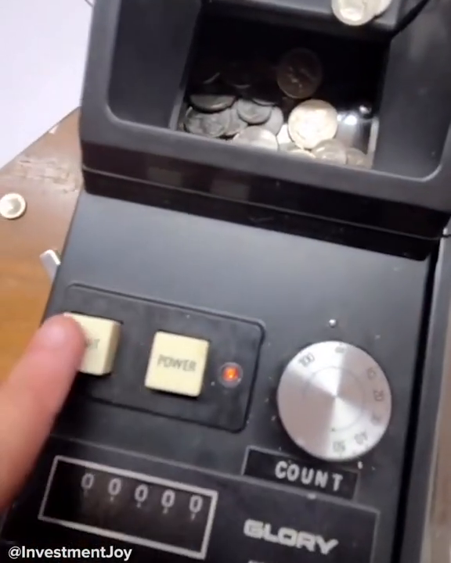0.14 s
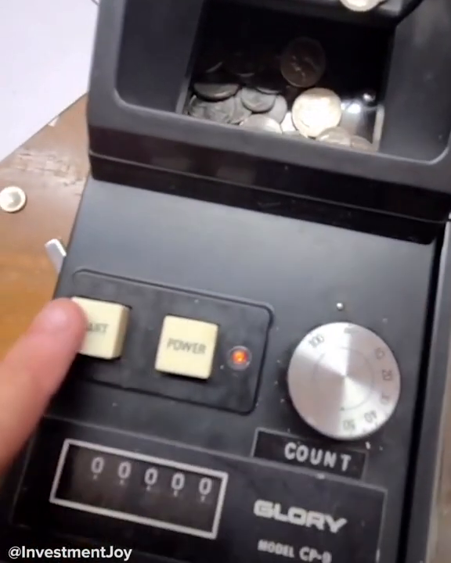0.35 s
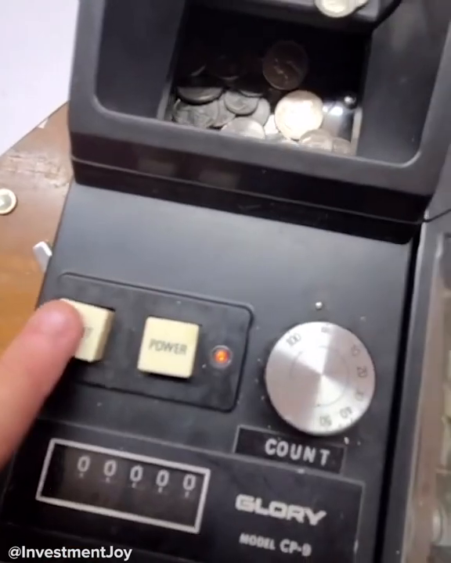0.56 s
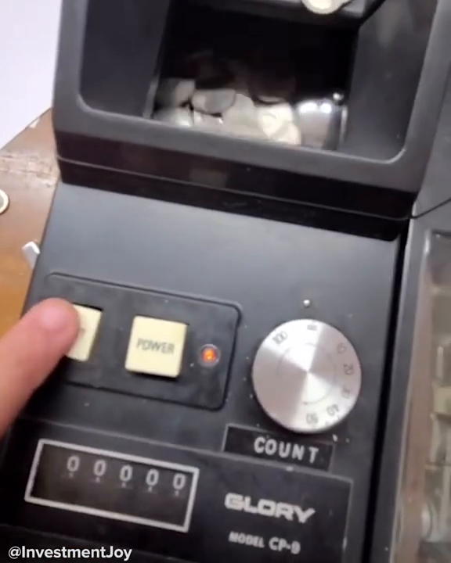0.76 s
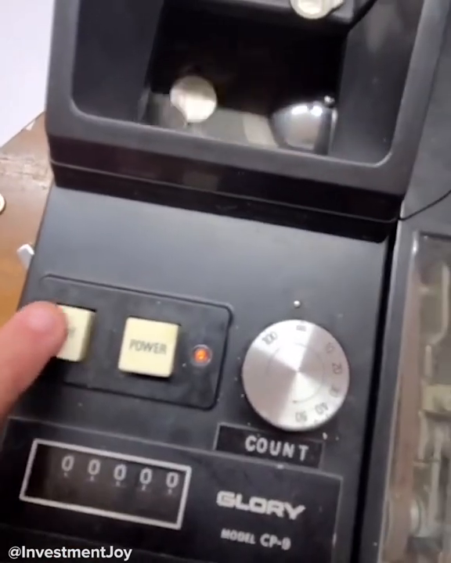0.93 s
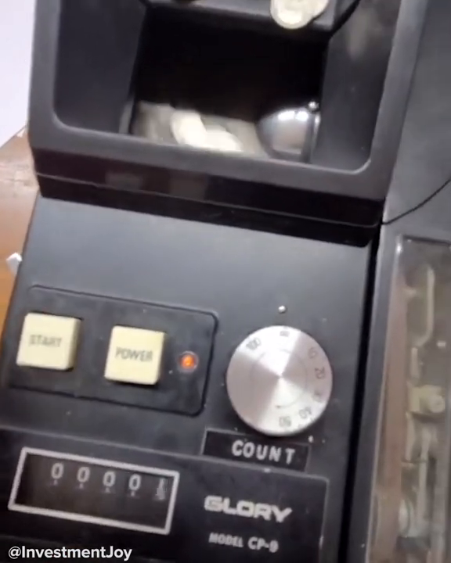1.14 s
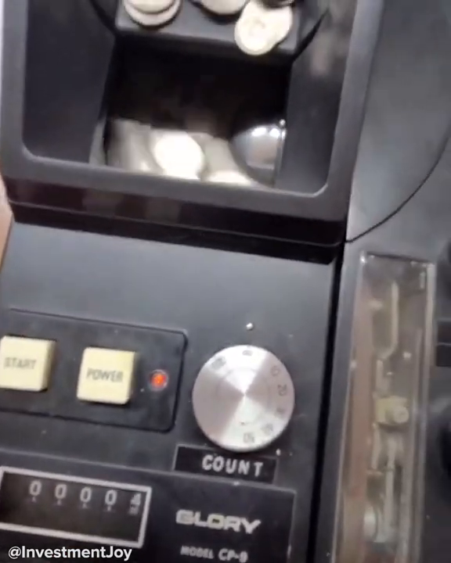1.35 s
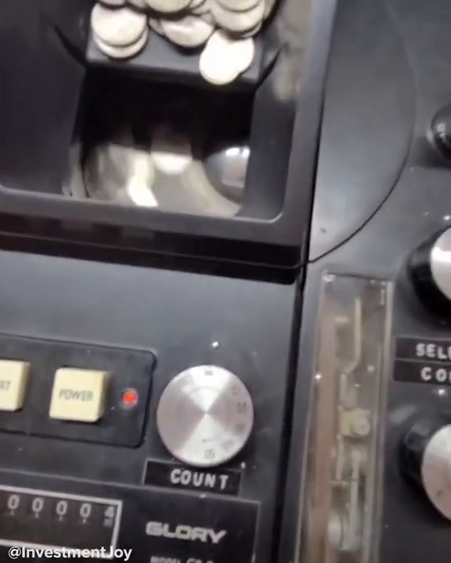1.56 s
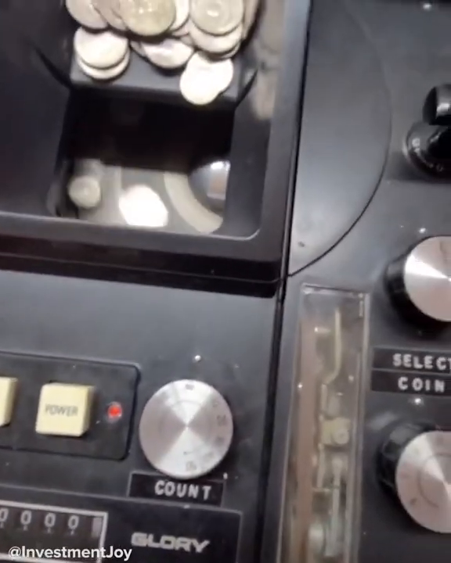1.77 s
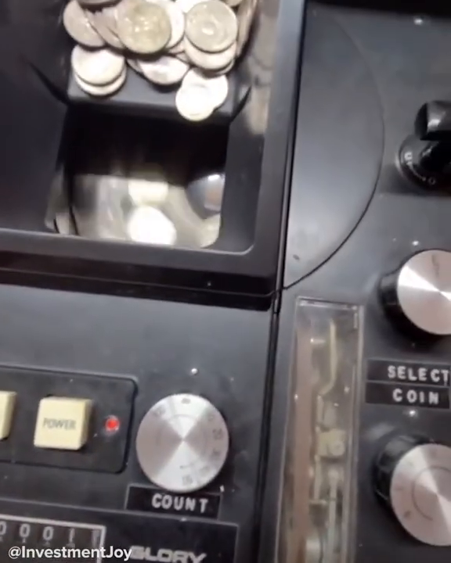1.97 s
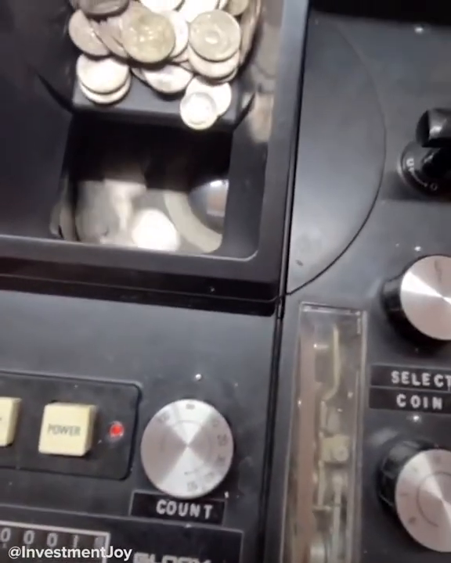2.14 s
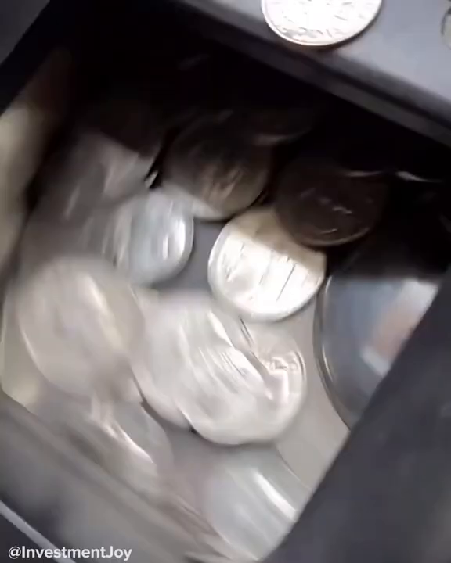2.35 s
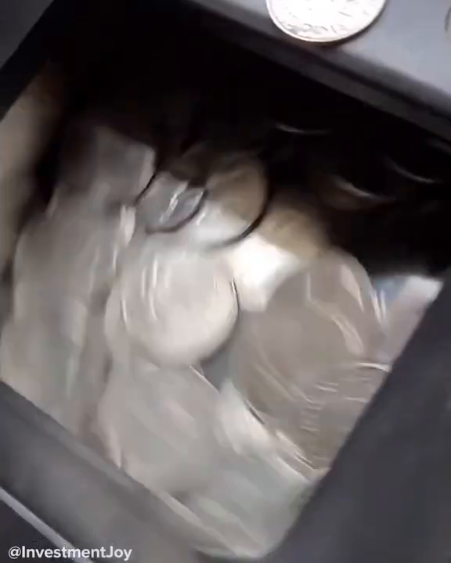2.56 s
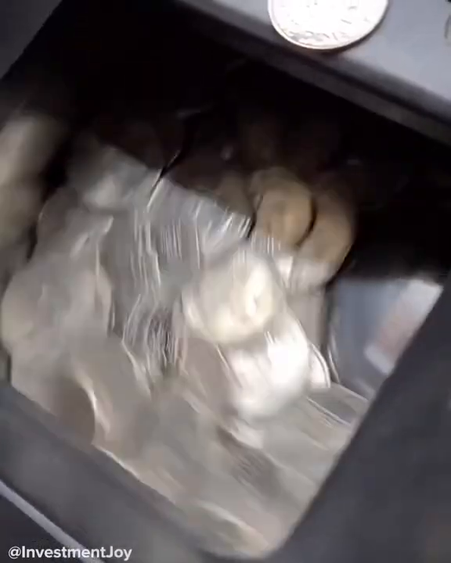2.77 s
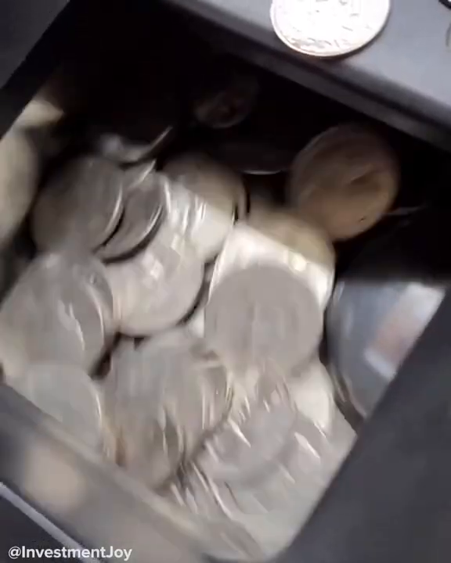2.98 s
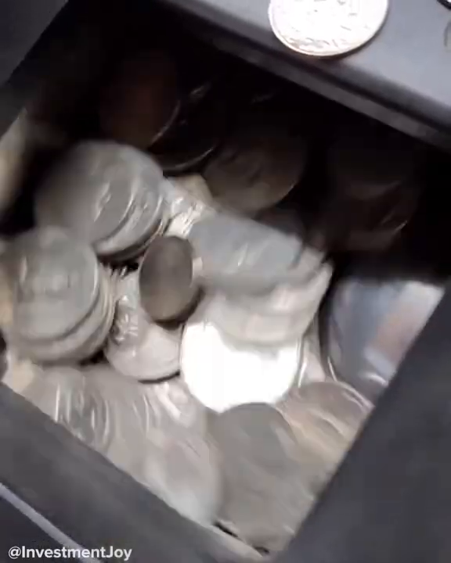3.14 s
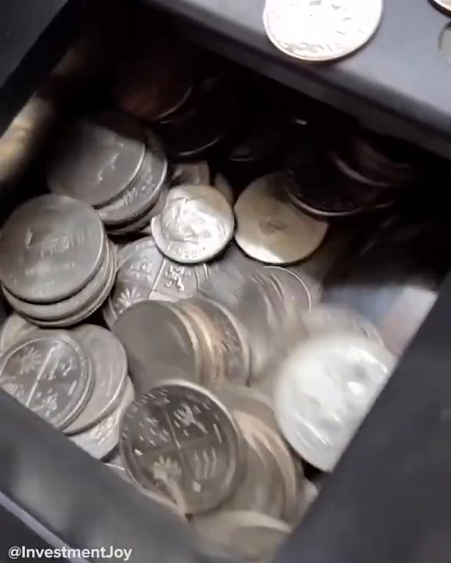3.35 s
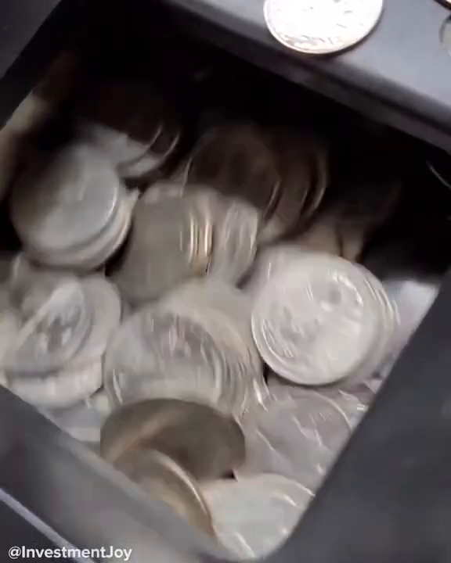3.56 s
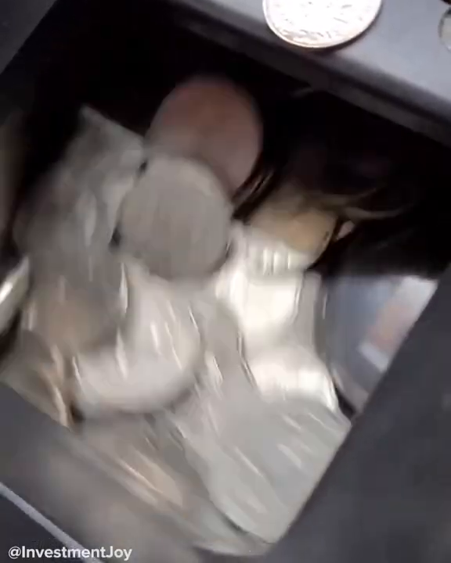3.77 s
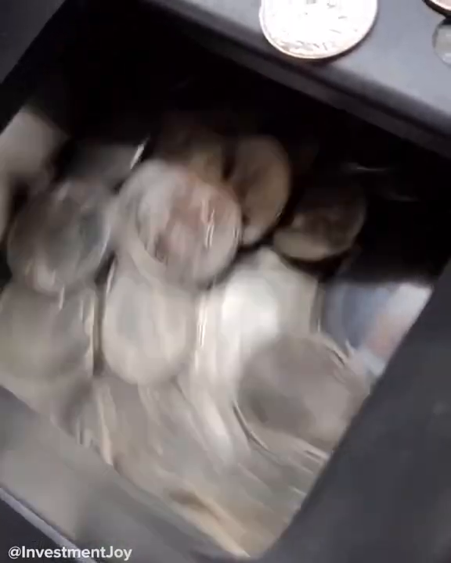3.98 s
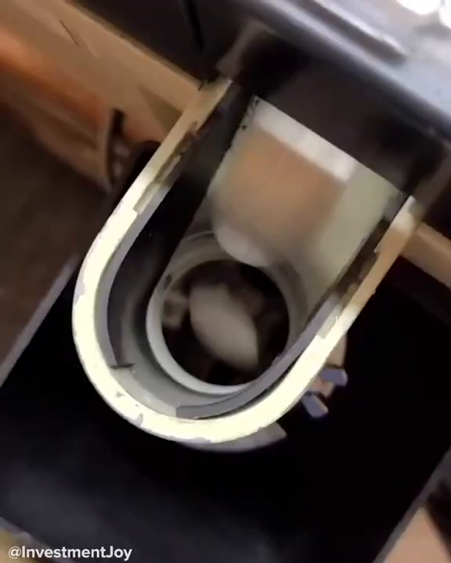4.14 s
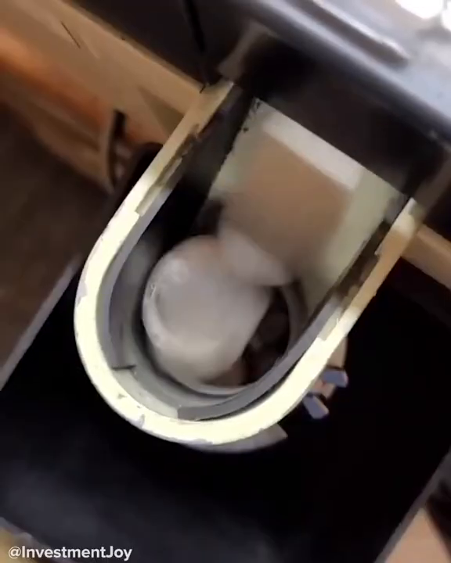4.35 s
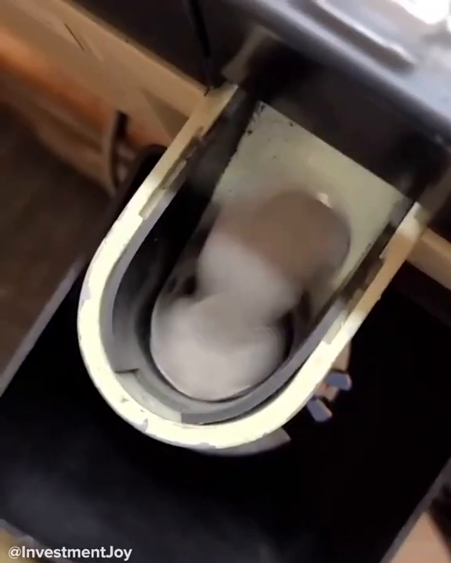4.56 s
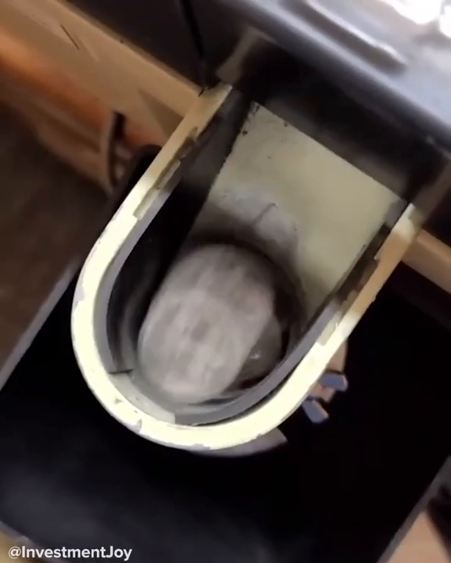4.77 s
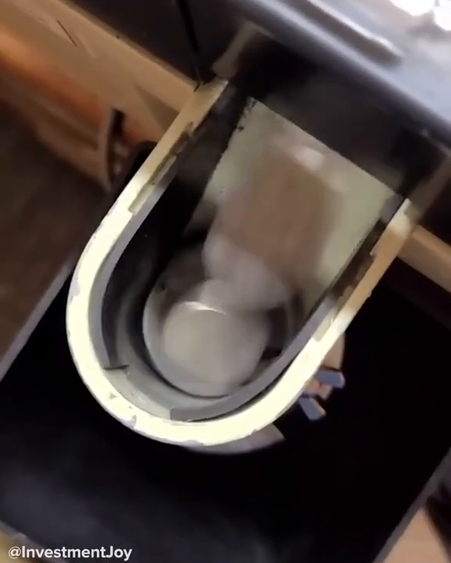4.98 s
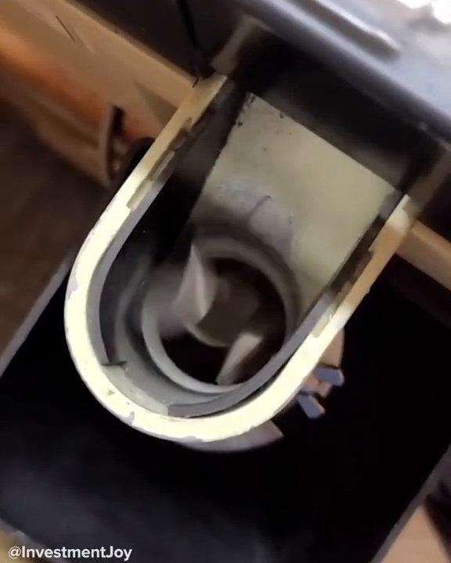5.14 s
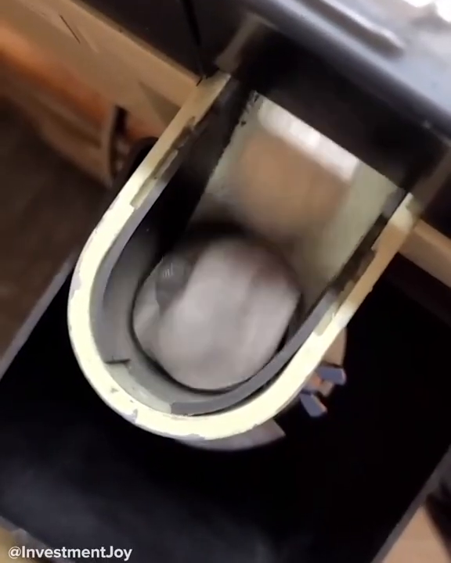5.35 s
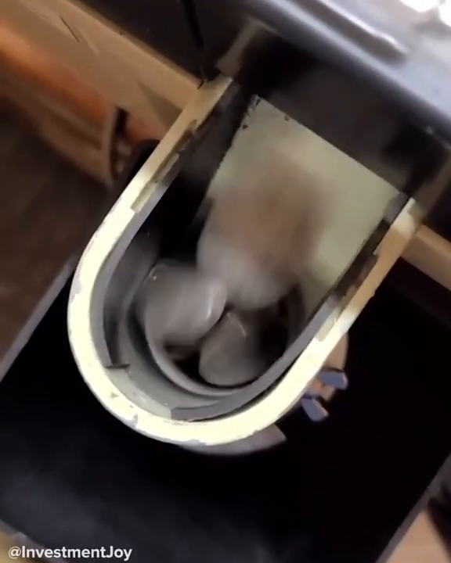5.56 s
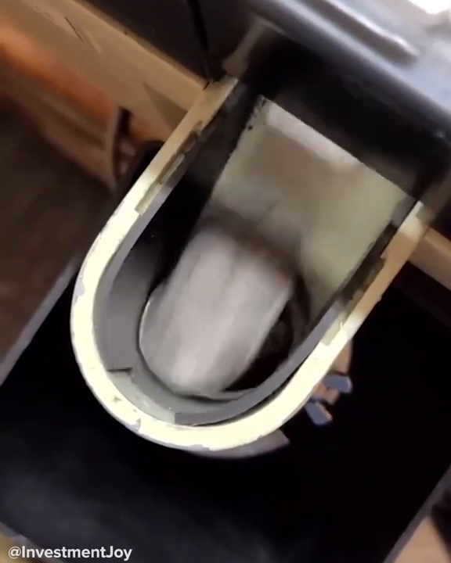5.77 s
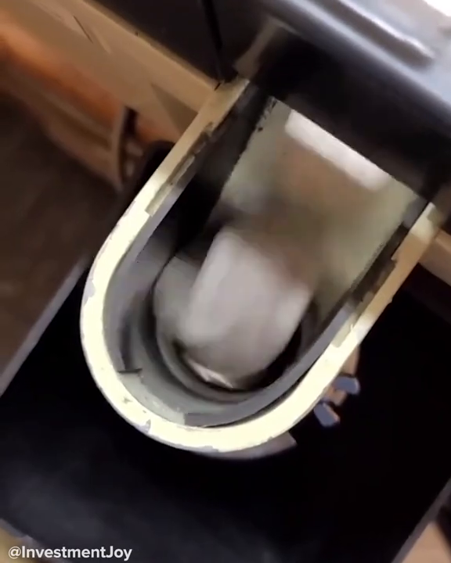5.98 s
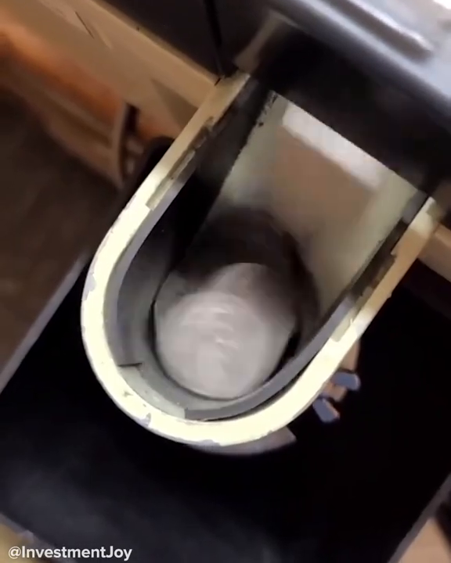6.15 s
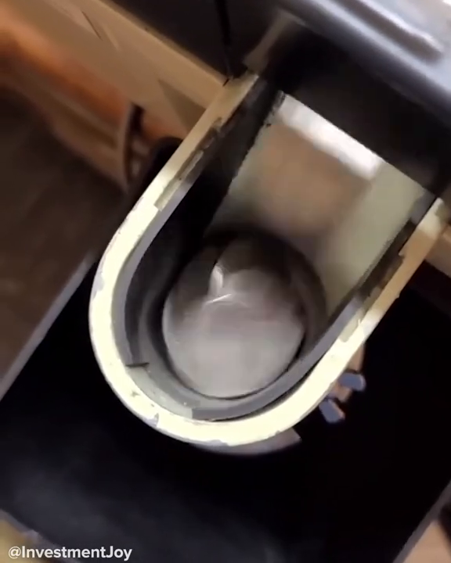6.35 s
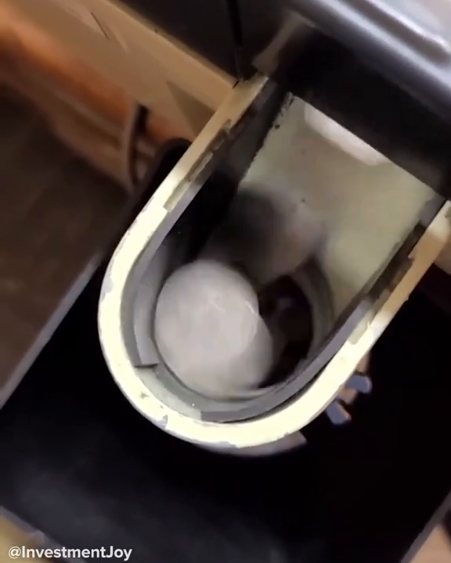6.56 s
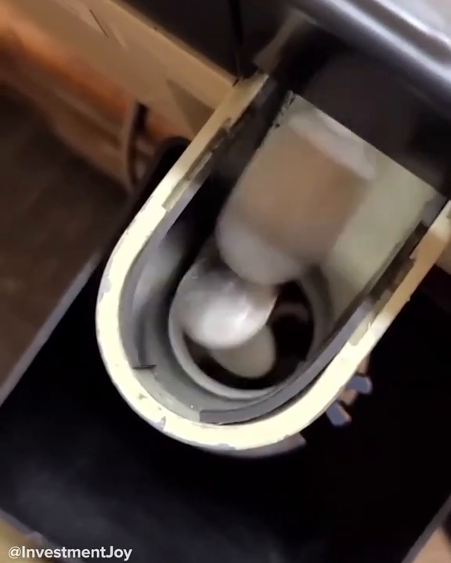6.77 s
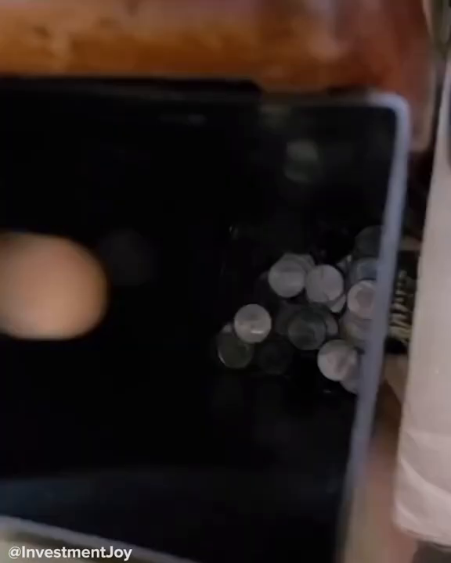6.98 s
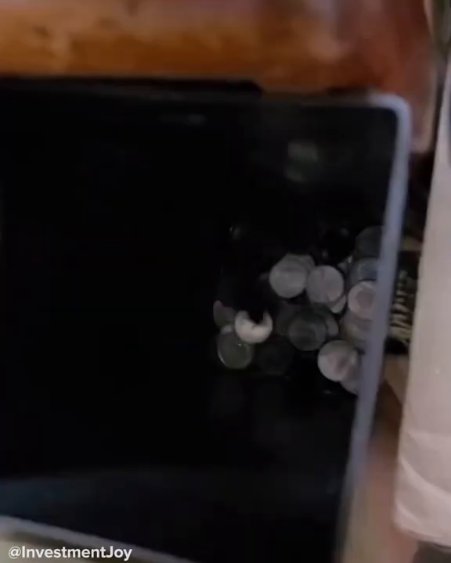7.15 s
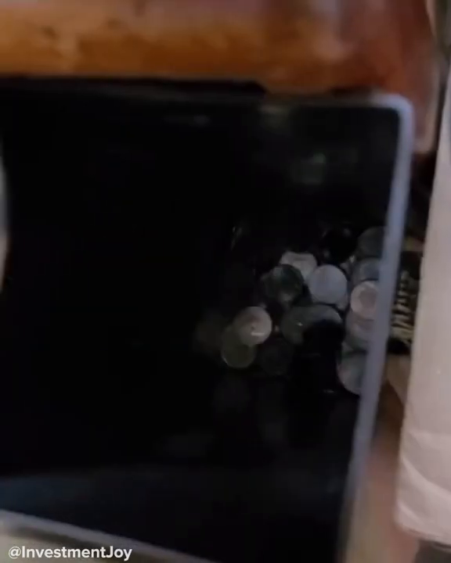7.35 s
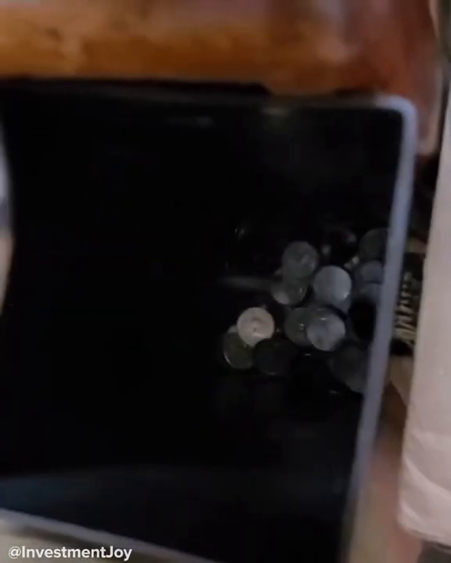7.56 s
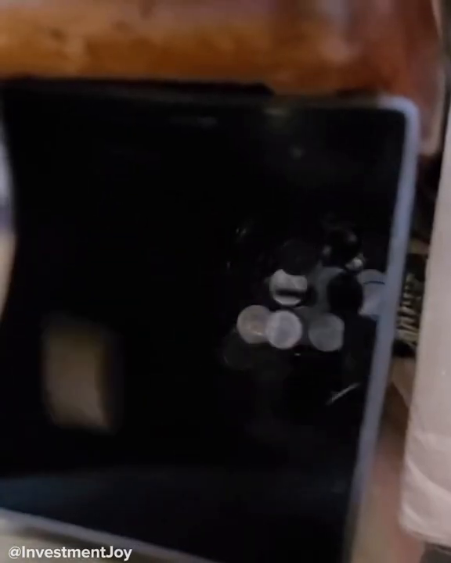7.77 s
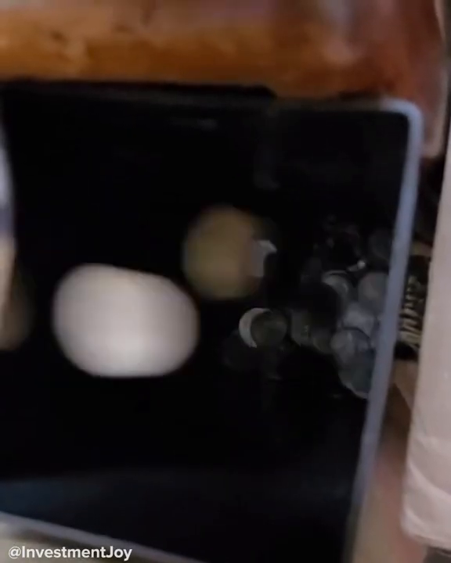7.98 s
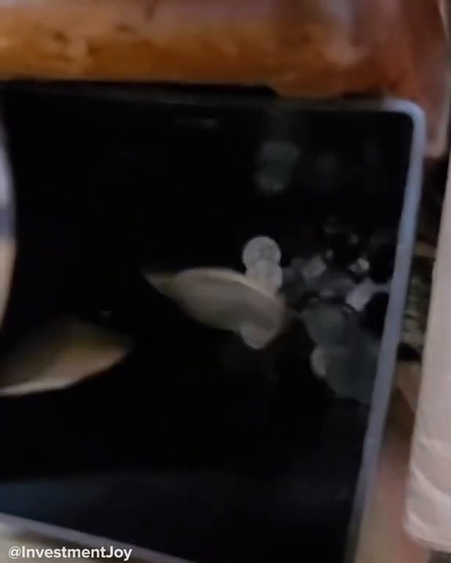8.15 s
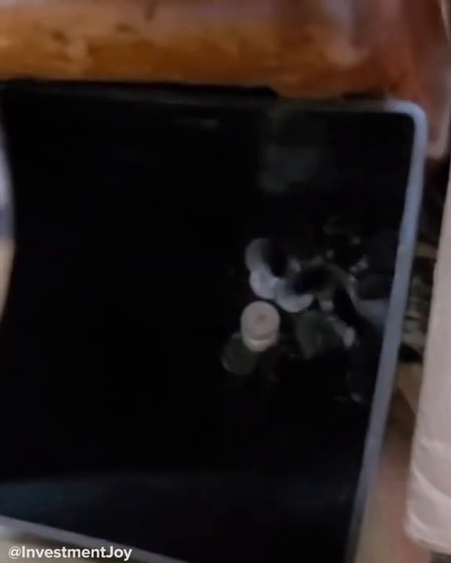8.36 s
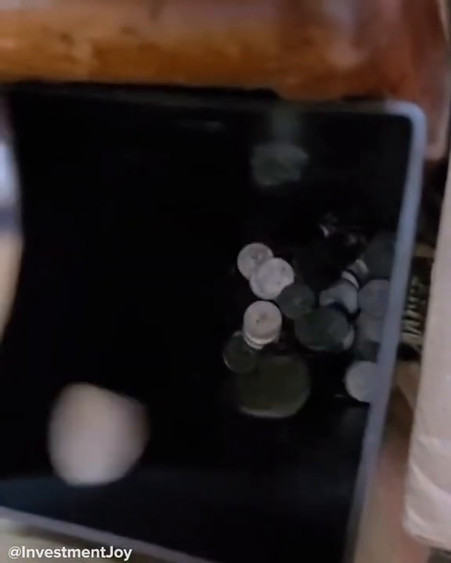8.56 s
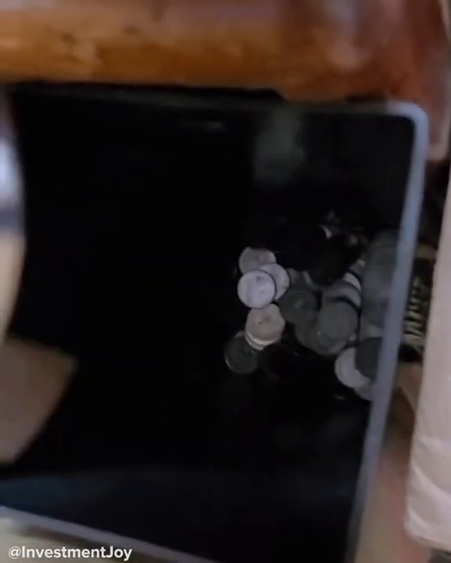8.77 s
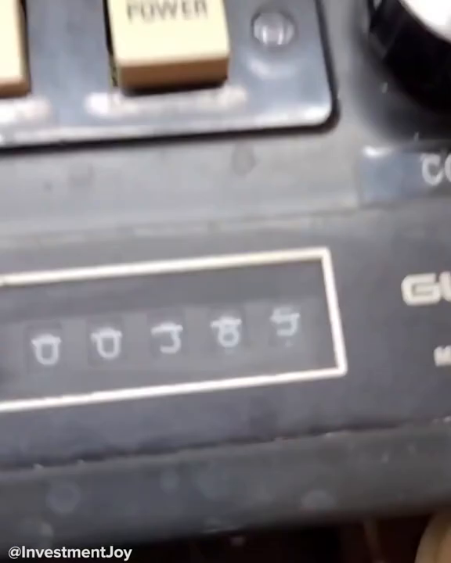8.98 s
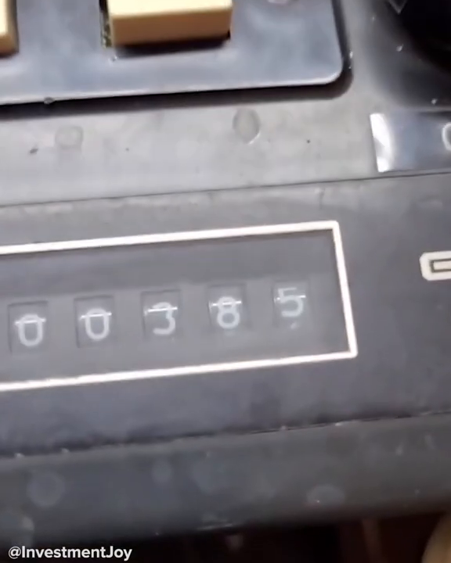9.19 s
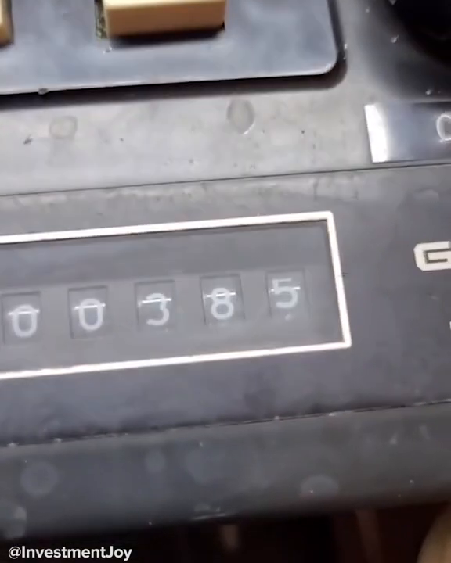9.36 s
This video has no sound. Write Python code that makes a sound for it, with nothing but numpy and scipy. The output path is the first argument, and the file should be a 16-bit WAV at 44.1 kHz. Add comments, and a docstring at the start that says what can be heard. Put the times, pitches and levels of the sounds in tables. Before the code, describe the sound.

Close stereo sound in a small, dry room, with a low electrical hum, soft drive rumble and faint air throughout. At 0.3 s a button gives a dull clack; at 0.45 s a switch snaps brightly and the disc starts with a short growl. Coins swirl and rattle, with a rough, juddering grind around 0.9-1.2 s, then from 1.35 s sharp, hollow knocks on the casing. At 2.25 s the sound cuts to dense metallic churning in a hopper, left of centre, with coins slapping the wall over a wavering low motor drone. From 4 s coins clack and clink rapidly down a short tube, bright and near centre, with brief scrapes. From 6.85 s they drop into a plastic bin, left-leaning, with clinks, hollow thuds and thin high ringing. At about 8.8 s the coins stop abruptly; only quiet hum, rumble and air remain.

```python
"""Coin counter on a desk

A motorised coin counter close to a stereo pair of microphones in a small room, humming throughout.
After a button and a switch, coins swirl on a disc and knock the casing, churn in the hopper, clack
down the outlet chute and drop ringing into a plastic bin, until the stream of coins stops short.
Noise bursts and random collisions through coloured filters and ringing modes make the coins;
sines and low noise make the drive."""
import sys
import numpy as np
from scipy import signal
from scipy.fft import rfft, irfft
from scipy.io import wavfile
from scipy.ndimage import uniform_filter1d

SR = 44100
rng = np.random.default_rng(int(sys.argv[2]) if len(sys.argv) > 2 else 0)


def master(y):
    """Save y as 16-bit WAV."""
    cut = np.clip(np.atleast_2d(y).T, -1, 1)
    pcm = np.round(cut * 32767)  # scale
    wavfile.write(sys.argv[1], SR, pcm.astype(np.int16))


N = 415422
TIME = np.arange(N) / SR

# colours of a coin contact, relative level per Hz: (hz, density_db)
# a light metal tick
TICK_COLOUR = [(1500, -50), (3200, 4.5), (5500, 4), (7500, 0.5), (9300, 7.5), (10500, 8), (12500, -4.5),
               (14500, -37.5)]
# a clack on a wall: (hz, density_db)
CLACK_COLOUR = [(400, -16), (690, -10), (830, 2), (1050, -7), (1300, 0), (1900, 0), (2700, -3), (4500, -16)]
# a thud through the body: (hz, density_db)
THUD_COLOUR = [(80, -20.5), (170, -11), (205, -5), (260, -6), (370, 5.5), (470, 3), (620, -5),
               (1100, -13.5)]
# the clink of a strike: (hz, density_db)
CLINK_COLOUR = [(1500, -40.5), (2700, -6), (4000, 1.5), (6300, 5), (7500, -2), (10000, -18)]
# the sparkle of a strike: (hz, density_db)
SPARKLE_COLOUR = [(5000, -50), (7300, -10.5), (8300, 0), (9300, 9.5), (10300, -1), (12500, 5), (14500, -30)]

# the coins are heard in four places in turn: (start_s, swell_s, end_s, fade_s)
ON_DISC = (0.41, 0.18, 2.222, 0.002)
IN_HOPPER = (2.258, 0.003, 3.98, 0.033)
IN_CHUTE = (3.97, 0.0065, 6.86, 0.045)
IN_BIN = (6.84, 0.035, 8.843, 0.0044)
# the first coins grind under the rim of the disc: (start_s, swell_s, end_s, fade_s)
GRINDING = (0.895, 0.078, 1.204, 0.098)
# left over right microphone, dB
HOPPER_PAN_DB, CHUTE_PAN_DB, BIN_PAN_DB = 8.5, -1, 16


def from_db(db):
    """Amplitude factor for a level in dB."""
    return 10 ** (np.asarray(db) / 20)


def rms_one(x):
    """Scale to an rms of one."""
    return x / np.sqrt(np.mean(x ** 2) + 1e-20)


def in_time(rows):
    """Each column of a curve, interpolated at every sample."""
    seconds, *columns = np.transpose(rows)
    return [np.interp(TIME, seconds, column) for column in columns]


def running(rows):
    """One while a curve lasts, with soft edges."""
    lasting = 1. * (TIME > rows[0][0]) * (TIME < rows[-1][0])
    return uniform_filter1d(lasting, size=180)


def during(start_s, swell_s, end_s, fade_s):
    """Envelope that swells, holds at one and fades, with ramps of at least 1 ms."""
    swell = np.clip((TIME - start_s) / max(swell_s, 1e-3), 0, 1) ** 2
    fade = np.clip((end_s - TIME) / max(fade_s, 1e-3), 0, 1)
    return swell * fade


def panned(pan_db):
    """Left and right gains of constant power."""
    gains = from_db(np.array([[.5], [-.5]]) * pan_db)
    return gains / np.sqrt(np.mean(gains ** 2, axis=0))


def cut(x, hz, kind, order=2):
    """Butterworth low or high pass."""
    return signal.sosfilt(signal.butter(order, hz, kind, fs=SR, output="sos"), x + 1e-18)


def convolve(x, response):
    """Convolve each channel, keeping the first N samples."""
    return signal.oaconvolve(np.atleast_2d(x), np.atleast_2d(response), axes=1)[:, :N]


def colour(x, spectrum, size=4096):
    """Minimum-phase filter with the given spectrum and unit power gain for white noise."""
    hz, db = np.transpose(spectrum)
    grid = np.maximum(np.fft.rfftfreq(size, 1 / SR), 1)
    outside = np.minimum(grid / hz[0], 1) * np.minimum(hz[-1] / grid, 1)  # falls off past both ends
    magnitude = from_db(np.interp(np.log(grid), np.log(hz), db)) * outside ** 2
    cepstrum = irfft(np.log(magnitude))
    # keeping only the causal half of the cepstrum makes the phase minimal
    response = irfft(np.exp(rfft(2 * cepstrum[:size // 2], size)))
    return convolve(x, response / np.linalg.norm(response))


def two_ears(pair, apart_hz=620):
    """Long waves reach both microphones alike, short ones differ."""
    side = cut(pair[1], apart_hz, "high", order=1)
    mid = pair[0] + 0.42 * cut(pair[0], apart_hz, "low", order=1)
    return np.array([mid + side, mid - side]) / np.sqrt(2)


def dying_noise(t60, size=6000):
    """Stereo scatter of reflections, of unit energy in each channel."""
    tail = rng.standard_normal((2, size)) * from_db(-60 * TIME[:size] / t60)
    return tail / np.linalg.norm(tail, axis=1, keepdims=True)


def ring(clicks, hz, t60):
    """Damped resonance: a unit click sets a sine of height 1 ringing."""
    radius = from_db(-60 / (t60 * SR))
    angle = 2 * np.pi * hz / SR
    poles = [1, -2 * radius * np.cos(angle), radius * radius]
    return signal.lfilter([0, np.sin(angle)], poles, clicks + 1e-18)


def clicks_at(seconds, heights):
    """Single-sample clicks at the given times."""
    out = np.zeros(N)
    out[np.clip(np.asarray(seconds) * SR, 0, N - 1).astype(int)] = heights
    return out


def contacts(per_s, spread_db):
    """Random collisions: many light ones, a few hard, of either sign."""
    when, hardness, sign = rng.random((int(per_s * N / SR), 3)).T
    force = from_db(spread_db * np.minimum(-np.log(hardness), 4))
    return clicks_at(when * N / SR, np.sign(sign - .5) * force)


def jostle(per_s, spread_db, scatter_t60, clump_db, clump_hz, count=4):
    """Collisions come in clumps at a few spots, each with its own reflections off the walls."""
    clumps = from_db(clump_db * rms_one(cut(rng.standard_normal(N), clump_hz, "low")))
    total = 0
    for _ in range(count):
        hits = contacts(per_s / count, spread_db) * clumps
        total = total + convolve(hits, dying_noise(scatter_t60, size=1500))
    return two_ears(rms_one(total))


def jingle(low_hz, high_hz, t60, per_s, spread_db, size=2600):
    """Each touch rings at its own pitch, soon damped, and reaches the two sides a little apart."""
    out, t = np.zeros((2, N + 2 * size)), TIME[:size]
    decay = from_db(-60 * t / t60)
    for when, a, b, hardness, place in rng.random((int(per_s * N / SR), 5)):
        hz = low_hz + (high_hz - low_hz) * (a + b) / 2
        force = from_db(spread_db * min(-np.log(hardness), 3))
        tone = force * decay * np.sin(2 * np.pi * hz * t)
        left, right = int(when * N) + 10, int(when * N + 20 * place)
        out[0, left:left + size] += np.sqrt(place) * tone
        out[1, right:right + size] += np.sqrt(1 - place) * tone
    return rms_one(out[:, :N])


def clashes(per_s, t60, spread_db, peaks_db, size=2048):
    """Coins in a heap clash in brief bursts, each with resonances set by the coins that meet."""
    rise_s, uneven = 0.002, 1.5  # uneven: stray from an even pace, in mean gaps
    out, t = np.zeros((2, N + size)), TIME[:size]
    shape = np.minimum(t / rise_s, 1) * from_db(-60 * t / t60)
    shape = shape * np.minimum(np.linspace(4, 0, size), 1)  # fade out the last quarter
    for k in range(int(per_s * N / SR)):
        start = min(int((k + rng.uniform(0, uneven)) * SR / per_s), N)
        peaks = rms_one(uniform_filter1d(rng.standard_normal(size // 2 + 1), size=8))
        gains = from_db(peaks_db * np.minimum(peaks, 1.5))
        touch = rms_one(irfft(rfft(rng.standard_normal((2, size))) * gains))
        out[:, start:start + size] += from_db(spread_db * rng.standard_normal()) * shape * touch
    return two_ears(rms_one(out[:, :N]))


def speckled(patchy_db, size):
    """Stereo noise with broad peaks and dips of its own: no two contacts have the same colour."""
    ripple = rms_one(uniform_filter1d(rng.standard_normal(size // 2 + 1), size=50))
    return rms_one(irfft(rfft(rng.standard_normal((2, size))) * from_db(patchy_db * ripple)))


def bursts(seconds, level_db, pan_db, rise_s, t60, tail_db, tail_t60, patchy_db, hold_s=0, size=6000):
    """Noise bursts: steep rise, optional hold, quick decay and a weaker tail of chatter."""
    out, t = np.zeros((2, N + size)), TIME[:size]
    decay = from_db(-60 * np.maximum(t - rise_s - hold_s, 0) / t60)
    chatter = from_db(tail_db - 60 * t / tail_t60)
    shape = np.minimum(t / rise_s, 1) ** 4 * (decay + chatter)
    for when, db, pan in zip(seconds, level_db, pan_db):
        start = int(when * SR)
        noise = two_ears(speckled(patchy_db, size))
        out[:, start:start + size] += from_db(db) * panned(pan) * shape * noise
    return out[:, :N]


def stream(load, pan_db, spectrum, grains, ringing, rattle_db, boom_db, ring_db,
           cavity_hz, cavity_t60, cavity_db):
    """Moving coins rattle, ring, and shake the casing and the hollow around them."""
    levels = in_time(load)  # a load with one level sets both rattle and boom
    sound = colour(grains, spectrum)
    rattle = from_db(rattle_db) * rms_one(cut(sound, 2760, "high", order=3))
    rattle = rattle + from_db(ring_db) * ringing
    boom = from_db(boom_db) * rms_one(cut(sound, 1720, "low", order=3))
    cavity = [ring(contacts(900, 3.0), cavity_hz, cavity_t60) for _ in range(2)]
    hollow = from_db(cavity_db) * rms_one(two_ears(cavity))
    return rattle * from_db(levels[0]) * panned(pan_db) + (boom + hollow) * from_db(levels[-1])


def room_air():
    """Steady air of the room: noise, strongest in the bass."""
    # relative level per Hz: (hz, density_db)
    air_colour = [(88, -28.5), (150, -4), (945, -29), (5420, -37), (6550, -49.5), (8550, -35),
                  (14000, -48.5)]
    return from_db(-65.5) * rms_one(colour(two_ears(rng.standard_normal((2, N))), air_colour))


def motor_hum():
    """Steady sines of the powered machine, louder while the motor takes up the load."""
    # partials of the hum, before load and distance: (hz, level_db)
    partials = [(119.5, -61.5), (698, -87), (1055, -88)]
    away_db = -10  # level away from the front panel, where the hum is loudest
    labouring = during(0.53, 0.11, 1.2, 0.28)
    added_db = 3  # level of the hum added under load, relative to the steady hum
    hum = sum(from_db(db) * rms_one(np.sin(2 * np.pi * hz * TIME)) for hz, db in partials)
    nearness = 1 - (1 - from_db(away_db)) * during(IN_HOPPER[0], .01, IN_BIN[2], .01)
    return hum * nearness * (1 + from_db(added_db) * labouring)


def drive_rumble():
    """Low noise of the shaking drive and desk, with judder from coins that grind on the rim."""
    # relative level per Hz: (hz, density_db)
    rumble_colour = [(15, -44.5), (25, -8.5), (81, 6), (124, -3.5), (145, -19), (175, -15.5), (230, -26),
                     (390, -120)]
    idle_db, disc_db, grind_db = -60.5, -73, -39  # idle, added by the disc, added by grinding
    hopper_db, bin_db = -13, 2  # change above the hopper and down by the bin
    noise = two_ears(rng.standard_normal((2, N)), apart_hz=378)
    rumble = rms_one(colour(noise, rumble_colour))
    shaking = (from_db(idle_db) + from_db(disc_db) * during(*ON_DISC)) * rumble
    shaking = shaking * from_db(hopper_db * during(*IN_HOPPER) + bin_db * during(*IN_BIN))
    judder = from_db(grind_db) * during(*GRINDING) * cut(rumble, 45, "high")
    return shaking + judder


def motor_drone():
    """Motor drone under the churning hopper: a sine that wavers in pitch and level."""
    # course of the drone, before wavering and trim: (start_s, pitch_hz, level_db)
    course = [(2.28, 176, -56.5), (2.456, 166.2, -57.5), (2.936, 171.7, -55), (3.008, 198, -62),
              (3.2, 201.7, -59), (3.45, 198.4, -51), (3.58, 209.9, -61), (3.76, 199.1, -62),
              (3.8, 200, -75)]
    pitch_hz, level_db = in_time(course)
    pitch_hz = pitch_hz * (1 + .03 * rms_one(cut(rng.standard_normal(N), 20, "low")))
    waver = from_db(1.3 * rms_one(cut(rng.standard_normal(N), 27, "low")))
    tone = rms_one(np.sin(2 * np.pi * np.cumsum(pitch_hz) / SR))
    return running(course) * from_db(level_db - 0.5) * waver * tone


def switch():
    """The button bottoms out with a dull clack; the start switch snaps brightly and jolts the casing."""
    # button, then start switch: (start_s, snap_db, clack_db, thud_db)
    presses = [(0.315, -56, -49, -64), (0.447, -31, -38, -42)]
    # snap, relative level per Hz: (hz, density_db)
    snap_colour = [(1500, -9), (3500, 9), (6000, 4), (10000, -3.5), (14000, -2)]
    start_s, snap_db, clack_db, thud_db = np.transpose(presses)
    pan_db = np.full(len(start_s), 4.)

    def hit(level_db):
        return bursts(start_s, level_db, pan_db, rise_s=0.0025, t60=0.018,
                      tail_db=-20, tail_t60=0.2, patchy_db=2.0)

    snap = colour(hit(snap_db), snap_colour)
    clack = colour(hit(clack_db), CLACK_COLOUR)
    return snap + clack + colour(hit(thud_db), THUD_COLOUR)


def grinding():
    """The disc growls as it starts to turn; then coins dragged along the rim judder against it."""
    # relative level per Hz: (hz, density_db)
    grind_colour = [(88, -32.5), (150, -12.5), (239, 1.5), (277, -9.5), (339, -3), (710, -5), (1030, -9.5),
                    (1310, -4.5), (1840, -13.5), (2360, -8), (3000, -10.5), (3900, -16), (6600, -120)]
    starting = during(0.35, 0.12, 0.556, 0.051)
    collisions = jostle(per_s=810, spread_db=0.5, scatter_t60=0.026, clump_db=2.0, clump_hz=80, count=2)
    slips = rms_one(colour(collisions, grind_colour))
    growl = starting * from_db(-44) * cut(slips, 2200, "low")
    return growl + during(*GRINDING) * from_db(-31.5) * slips


def knocks():
    """Coins flung off the disc strike the casing, which rings low and hollow but radiates no bass."""
    # coins kicked against the casing, before the trims below; tick and clack relative to the peak:
    # (start_s, peak_db, tick_db, clack_db)
    kicks = [(1.35, -22.5, -7, -3), (1.449, -17, -4, -21), (1.502, -20.5, -7, -29),
             (1.559, -23.5, -4, -7.5), (1.578, -41, 11, -11), (1.631, -33.5, 5, -2), (1.639, -29.5, 0, -6),
             (1.873, -28.5, -3, -21), (1.887, -29.5, -6, -21), (1.907, -23.5, -4.5, -29),
             (2, -24, -2.5, -14), (2.07, -36, -2, -7), (2.113, -32.5, 2.5, -22), (2.135, -44, 12, -10),
             (2.15, -38.5, 9, -13), (2.183, -26.5, -5.5, -27)]
    # modes of the casing: (hz, level_db, t60_s)
    casing_modes = [(396.4, -3.5, 0.1), (442.4, -4, 0.12), (466.6, -7.5, 0.14), (576, -11, 0.031),
                    (745, -7, 0.044), (832, -23, 0.14), (1330, -18, 0.048), (1610, -27, 0.12)]
    start_s, peak_db, tick_db, clack_db = np.transpose(kicks)
    count = len(start_s)

    def wall():
        """One side of the casing, its modes differently strong at each knock."""
        total = 0
        for hz, db, t60 in casing_modes:
            heights = from_db(peak_db + db + 2 * rng.standard_normal(count))
            total = total + ring(clicks_at(start_s + 0.00117, heights), hz, t60)
        return total

    body = cut(np.array([wall(), wall()]), 422, "high", order=3)
    tick = bursts(start_s, peak_db + tick_db, np.ones(count), rise_s=.0015, t60=.03,
                  tail_db=-20, tail_t60=.1, patchy_db=3)
    clack = bursts(start_s, peak_db + clack_db, np.zeros(count), rise_s=.002, t60=.03,
                   tail_db=-20, tail_t60=.1, patchy_db=3)
    chatter = bursts(start_s, peak_db - 10, np.zeros(count), rise_s=0.0041, t60=0.03,
                     tail_db=-15, tail_t60=0.14, patchy_db=2)
    metal = from_db(-1.0) * colour(tick, TICK_COLOUR) + colour(clack, CLACK_COLOUR)
    return from_db(-0.9) * body + metal + colour(chatter, THUD_COLOUR)


def tosses():
    """Now and then a coin leaps from the churning heap and slaps the hopper wall."""
    # coins tossed against the wall, relative level: (start_s, peak_db)
    leaps = [(2.261, -22), (2.314, -17.5), (2.469, -16.5), (2.629, -39), (2.698, -19), (2.786, -15.5),
             (2.877, -21), (2.968, -19), (3.152, -21), (3.246, -20), (3.281, -25), (3.309, -19),
             (3.663, -27), (3.781, -15.5)]
    start_s, peak_db = np.transpose(leaps)
    slap = bursts(start_s, peak_db - 17, np.full(len(start_s), HOPPER_PAN_DB), rise_s=0.0018,
                  t60=0.23, tail_db=-19, tail_t60=0.31, patchy_db=6.0)
    return colour(slap, TICK_COLOUR) + from_db(-12.0) * colour(slap, CLACK_COLOUR)


def skids(clash):
    """A coin that has landed slides over the others, scraping and shimmering."""
    # coins skidding after a fall, relative level: (start_s, length_s, level_db)
    slides = [(4.176, 0.15, -46), (4.492, .035, -36), (4.555, 0.033, -39.5), (4.617, 0.034, -39.5),
              (4.8, 0.067, -44), (5.247, 0.093, -43), (5.552, 0.027, -36), (5.59, 0.073, -33.5),
              (5.874, 0.15, -42.5), (5.954, 0.027, -45), (6.192, 0.057, -39), (6.404, 0.088, -38),
              (6.754, 0.1, -40), (7.163, 0.057, -48), (7.562, 0.022, -41), (7.837, 0.066, -41.5),
              (7.965, 0.03, -43), (8.098, 0.05, -43), (8.24, 0.044, -42), (8.518, .055, -49)]
    swell_s = 0.0059
    sliding = sum(from_db(db) * during(s, swell_s, s + length, length / 2) for s, length, db in slides)
    scrape = jostle(per_s=3000, spread_db=0.5, scatter_t60=0.012, clump_db=-2.0, clump_hz=90, count=2)
    sound = from_db(-7.0) * rms_one(colour(scrape + clash, CLINK_COLOUR))
    sound = sound + from_db(1.5) * colour(scrape, SPARKLE_COLOUR)
    sound = sound + from_db(-10) * colour(scrape, CLACK_COLOUR)
    place = np.where(TIME < IN_BIN[0], panned(CHUTE_PAN_DB), panned(BIN_PAN_DB))
    return sliding * sound * place


def chimes():
    """A free coin rings on, its modes differently strong at each bounce and each microphone."""
    # coins that bounce free, relative level: (start_s, peak_db)
    bounces = [(6.201, -62), (6.6059, -61), (6.7353, -56), (7.231, -61), (7.4679, -67), (7.5592, -66),
               (7.944, -71), (8.0805, -60), (8.19, -70)]
    # modes of a free coin: (hz, level_db, t60_s)
    coin_modes = [(9450, 4, 0.2), (10313, -3, .5), (10500, -6, .4), (11062, 0, 0.6), (11343, -6, .45),
                  (11484, -6, 0.45), (12563, -1, 0.6)]
    start_s, peak_db = np.transpose(bounces)

    def side():
        """The ringing at one microphone."""
        total = 0
        for hz, db, t60 in coin_modes:
            heights = from_db(peak_db + db + 2 * rng.standard_normal(len(start_s)))
            total = total + ring(clicks_at(start_s, heights), hz, t60)
        return total

    return from_db(5.5) * np.array([side(), side()]) * panned(2.5)


def lulls():
    """Gain of the tumbling coins: it sinks for a moment at each gap in the stream."""
    # gaps in the stream: (start_s of the deepest point, depth_db)
    gaps = [(3.982, -7), (4.143, -8), (4.42, -4), (4.715, -5.5), (4.757, -20.5), (4.786, -2.5), (5.12, -5),
            (5.18, -8), (5.415, -6.5), (5.5, -9.5), (6.035, -1.5), (6.13, -4.5), (6.349, -9.5),
            (6.595, -4.5), (7.225, -1.5), (7.545, -4), (7.938, -3), (8.068, -3), (8.238, -7), (8.4, -11.5),
            (8.603, -6)]
    width_s = .014
    return from_db(sum(db * np.exp(-((TIME - s) / width_s) ** 2) for s, db in gaps))


def coins_on_disc(swirl, sliding):
    """Coins swirling on the disc rattle and shake the hollow casing."""
    # load of coins, before the trims below: (start_s, rattle_db, boom_db)
    load = [(0.7, -32, -43), (0.782, -33, -40), (0.992, -34.5, -40), (1.176, -35, -48), (1.446, -41.5, -40),
            (1.852, -40.5, -48.5), (2.2, -44.5, -45)]
    # relative level per Hz: (hz, density_db)
    spectrum = [(130, -34), (190, -0.5), (396, 5.5), (447, -3.5), (523, 3.5), (702, 5.5), (765, 4),
                (1480, -1.5), (2810, -4.5), (3220, -6.5), (4720, -8), (7660, -9.5), (9270, -15),
                (11800, -5), (13800, -17.5)]
    return during(*ON_DISC) * stream(
        load, 4, spectrum, swirl, sliding, rattle_db=1.0, boom_db=-2.4, ring_db=-3.5,
        cavity_hz=459, cavity_t60=0.078, cavity_db=-4.0)


def coins_in_hopper(swirl, sliding):
    """Coins churning in the full hopper rattle and shake its shell."""
    # load of coins, before the trims below: (start_s, rattle_db, boom_db)
    load = [(2.28, -36.5, -40), (2.992, -36.5, -41), (3.004, -38, -44), (3.066, -35, -41.5),
            (3.268, -42, -43.5), (3.31, -34.5, -41.5), (3.366, -40.5, -40), (3.5, -33, -37.5),
            (3.778, -34.5, -40), (3.786, -33.5, -36), (3.804, -39, -42.5), (3.878, -37.5, -40.5),
            (3.898, -34, -35.5), (3.94, -35.5, -43)]
    # relative level per Hz: (hz, density_db)
    spectrum = [(150, -37), (260, -30), (334, 1), (421, -13), (473, 2), (627, -3), (753, 2), (1420, -7),
                (1820, -14.5), (2370, -5.5), (3420, -7.5), (5000, -11.5), (7220, -11.5), (9260, -10.5),
                (12700, -10.5), (13800, -19)]
    return during(*IN_HOPPER) * stream(
        load, HOPPER_PAN_DB, spectrum, swirl, sliding, rattle_db=2.0, boom_db=-0.24, ring_db=-6.5,
        cavity_hz=492, cavity_t60=0.029, cavity_db=-5.0)


def coins_in_chute(tumble, falling):
    """Coins tumbling down the outlet chute rattle in its short hollow."""
    # flow of coins, before the trims below: (start_s, level_db)
    flow = [(4.0, -45.5), (4.2, -43.5), (4.37, -42), (5.24, -42.5), (5.35, -44), (5.48, -44.5),
            (5.61, -45.5), (5.97, -44.5), (6.08, -41.5), (6.17, -43), (6.82, -44.5)]
    # relative level per Hz: (hz, density_db)
    spectrum = [(110, -44.5), (180, -4), (294, -7.5), (372, -2.5), (677, -11.5), (825, -5), (992, -16),
                (1870, -6), (3600, -6), (5990, -3.5), (6560, -8.5), (9260, 0.5), (10300, -5), (12400, -2.5),
                (13800, -25.5)]
    return during(*IN_CHUTE) * stream(
        flow, CHUTE_PAN_DB, spectrum, tumble, falling, rattle_db=1.5, boom_db=-5.5, ring_db=-5.0,
        cavity_hz=816, cavity_t60=0.029, cavity_db=-16)


def coins_in_bin(tumble, falling):
    """Coins heaping up in the plastic bin rattle and ring over its hollow."""
    # flow of coins, before the trims below: (start_s, level_db)
    flow = [(6.89, -39.5), (7.12, -45), (7.29, -39), (7.43, -43.5), (7.53, -42.5), (7.7, -41.5),
            (8.15, -46.5), (8.22, -51), (8.28, -46.5), (8.34, -50), (8.4, -42.5), (8.62, -47), (8.81, -40)]
    # relative level per Hz: (hz, density_db)
    spectrum = [(110, -53), (180, -14.5), (393, -9.5), (507, -11), (565, -26), (630, -10), (1070, -17),
                (1770, -14), (3870, -3.5), (5990, 0), (8000, -2.5), (9260, -12), (10300, 1), (12800, 5),
                (13800, -15)]
    return during(*IN_BIN) * stream(
        flow, BIN_PAN_DB, spectrum, tumble, falling, rattle_db=-4.5, boom_db=-2.5, ring_db=-3.5,
        cavity_hz=442, cavity_t60=0.053, cavity_db=-18.5)


def strikes():
    """Each falling coin sparkles, clinks, clacks and thuds, and rings the tube or the bin floor."""
    # coins striking chute and bin, before the trims below; pan is left over right:
    # (start_s, clink_db, sparkle_db, clack_db, thud_db, pan_db)
    falls = [(4.003, -37, -29.5, -35, -55, -3), (4.154, -33, -32.5, -40, -33, -3),
             (4.262, -29, -29, -28, -37.5, 0), (4.317, -45, -43, -46, -35, -4),
             (4.338, -32, -30, -42, -43, -3), (4.481, -30, -26, -32, -35, -1),
             (4.489, -31.5, -35, -37, -41, -8), (4.549, -31, -32, -43, -46, -3),
             (4.604, -51, -45, -41, -34, -1), (4.628, -38, -40, -38, -46, -5),
             (4.692, -37, -31, -31.5, -41, -7), (4.751, -55, -45, -40, -37, -7),
             (4.727, -42, -32, -34, -42, -2), (4.769, -30.5, -31, -31.5, -40, -2),
             (4.787, -55, -50, -47, -38, -3), (4.805, -32, -44, -37.5, -37.5, -11),
             (4.918, -34, -33, -34, -40, -4), (4.964, -50, -40, -40, -44, -7),
             (5.027, -45, -46, -43, -36.5, -7), (5.062, -28.5, -30, -38.5, -48, -1),
             (5.129, -31.5, -29, -32, -40, -3), (5.191, -30, -28.5, -30.5, -41, -5),
             (5.234, -37, -22.5, -38, -46, 0), (5.378, -35.5, -27, -41, -55, -2),
             (5.533, -40, -38, -38.5, -31, -2), (5.551, -29.5, -29, -40, -38, -2),
             (5.598, -32.5, -28, -33.5, -33.5, -5), (5.644, -36, -41, -36, -44, -10),
             (5.687, -37, -30, -37, -58, -10), (5.862, -33, -29, -39, -37, -10),
             (5.871, -38, -29.5, -36, -41, 3), (5.89, -34, -37, -37, -41, -4),
             (5.956, -35, -38, -52, -50, -1), (6.002, -40, -37, -38.5, -41, -10),
             (6.063, -45, -33, -36, -55, -9), (6.104, -46, -34, -39, -59.5, -4),
             (6.16, -36.5, -44, -36.5, -35, -9), (6.2, -48, -41, -39, -44, -12),
             (6.218, -47, -33, -54, -47, -4), (6.234, -42, -40, -36, -49, -7),
             (6.276, -51, -30.5, -49, -63, -2), (6.378, -47, -39, -47, -38, -6),
             (6.406, -37, -40, -39, -39, -18), (6.52, -33, -29, -36, -38, -4),
             (6.552, -34.5, -32, -38, -46.0, -7), (6.605, -36, -32, -31, -35, -3),
             (6.731, -29.5, -29, -42, -49, -1), (6.743, -46, -37, -39, -55, -5),
             (6.77, -39, -40, -35, -35, -15), (6.785, -35, -38, -44, -36, -4),
             (6.899, -35, -52, -35, -54, 16), (6.935, -41, -49, -43, -39.5, 17),
             (6.978, -36, -28, -37, -38, 11), (7.04, -43, -33, -43, -40.5, 9),
             (7.086, -56, -48, -53, -44, 6), (7.203, -35.5, -49, -35.5, -34, 2),
             (7.23, -31.5, -33, -44, -51, 18), (7.247, -50, -39, -29.5, -30, 6),
             (7.279, -44, -42, -32.5, -33, -8), (7.382, -34, -32, -44, -52, 13),
             (7.466, -39.0, -30.5, -40, -38, 13), (7.556, -32, -29.5, -44, -34, 14),
             (7.575, -37, -38, -38, -34, 2), (7.644, -34.5, -33, -54, -44, 12),
             (7.618, -50, -53, -50, -40.5, 6), (7.673, -37.5, -36, -52, -40.5, 5),
             (7.742, -33, -32, -31.5, -34, 13), (7.807, -38, -41, -44, -41, 0),
             (7.855, -40, -37, -42, -34, 8), (7.868, -45, -38, -52, -41.5, 8),
             (7.911, -52, -42, -52, -42, 9), (7.946, -41, -35, -40, -33.5, 10),
             (7.968, -55, -39, -46, -44, 4), (7.995, -54, -36, -49, -42, 8),
             (8.081, -50, -31, -40, -33, 12), (8.146, -53, -36, -38, -35.5, 8),
             (8.188, -39, -34, -40, -41, 8), (8.246, -56, -34, -43, -45, 14),
             (8.284, -63, -48, -47, -43, 6), (8.38, -37, -28.5, -38, -35, 11),
             (8.409, -51, -38, -39, -36, 10), (8.425, -50, -33, -37, -44, 16),
             (8.462, -57, -50, -44, -38, 6), (8.481, -34, -30.5, -32, -36, 8),
             (8.533, -50, -32, -38, -42, 2), (8.643, -47, -42, -46, -41, 9), (8.7, -35.5, -56, -51, -67, 9),
             (8.714, -35.5, -56, -47, -61, 9), (8.791, -35, -29, -35, -37.5, 8),
             (8.817, -57, -43, -44, -35.5, 1)]
    # modes of the bin floor: (hz, level_db, t60_s)
    floor_modes = [(223, -3, 0.063), (239, -6, 0.056), (447, -13, 0.07), (635, -11, 0.06)]
    # the outlet is a short, well damped tube: (hz, t60_s)
    tube_modes = [(800, .042), (850, .042)]
    start_s, clink_db, sparkle_db, clack_db, thud_db, pan_db = np.transpose(falls)
    hit = dict(rise_s=.0033, hold_s=.0017, t60=.018)
    sparkle = bursts(start_s, sparkle_db - 1, pan_db, tail_db=-20, tail_t60=.12, patchy_db=3, **hit)
    clink = bursts(start_s, clink_db, pan_db, tail_db=-25, tail_t60=.12, patchy_db=6, **hit)
    clack = bursts(start_s, clack_db, pan_db / 2, tail_db=-23, tail_t60=0.11, patchy_db=2.5, **hit)
    thud = bursts(start_s, thud_db + .5, 0 * pan_db, rise_s=0.0016, t60=0.042,
                  tail_db=-16, tail_t60=0.092, patchy_db=2.5)
    # neighbouring modes of the tube ring in opposite phase
    tube = sum((-1) ** k * ring(clack, hz, t60) for k, (hz, t60) in enumerate(tube_modes))
    tube = from_db(-23.5) * during(*IN_CHUTE) * tube
    floor = 0
    for hz, db, t60 in floor_modes:
        floor = floor + ring(clicks_at(start_s + 0.00233, from_db(thud_db + db)), hz, t60)
    floor = cut(during(*IN_BIN) * floor, 245, "high")
    bright = colour(sparkle, SPARKLE_COLOUR) + colour(clink, CLINK_COLOUR)
    dull = colour(clack, CLACK_COLOUR) + colour(thud, THUD_COLOUR)
    return bright + dull + tube + floor


def scene():
    """The coins pass through the four places in turn, with a short room tail, over drive and air."""
    churn = clashes(per_s=130, t60=0.11, spread_db=3, peaks_db=8)
    clash = clashes(per_s=70, t60=0.16, spread_db=2.2, peaks_db=9)
    chinks = jingle(low_hz=1404, high_hz=7810, t60=.075, per_s=600, spread_db=2.0)
    packed = jostle(per_s=700, spread_db=3.0, scatter_t60=0.008, clump_db=1.0, clump_hz=45)
    loose = jostle(per_s=900, spread_db=2.0, scatter_t60=0.03, clump_db=1.5, clump_hz=30)
    swirl = from_db(-5) * chinks + from_db(-4) * packed + churn
    tumble = lulls() * (from_db(-6) * loose + clash + from_db(-6) * chinks)
    sliding = jingle(low_hz=8510, high_hz=9960, t60=0.11, per_s=360, spread_db=-1.0)
    falling = jingle(low_hz=8850, high_hz=9750, t60=0.14, per_s=220, spread_db=2.0)

    coins = switch() + grinding() + knocks() + tosses() + skids(clash) + chimes()
    coins += coins_on_disc(swirl, sliding) + coins_in_hopper(swirl, sliding)
    coins += coins_in_chute(tumble, falling) + coins_in_bin(tumble, falling)
    coins += strikes()
    room = from_db(-9.0) * convolve(coins, dying_noise(t60=0.069))
    drive = motor_hum() + drive_rumble() + motor_drone()
    return coins + room + room_air() + drive


def record(dry):
    """The hardest knocks are rounded a little and the top is cut steeply above 13.7 kHz."""
    rounded = .3 * np.tanh(dry / .3)
    steep = signal.ellip(8, .3, 70, 13700, fs=SR, output="sos")  # 0.3 dB ripple, 70 dB stop band
    return signal.sosfilt(steep, rounded)


dry = scene()
out = record(dry)
master(out)
```